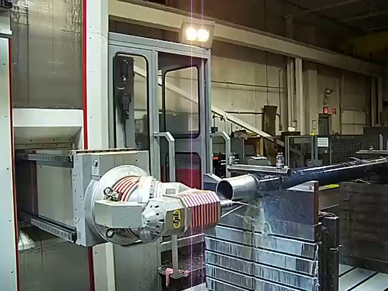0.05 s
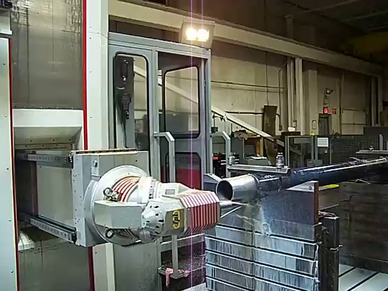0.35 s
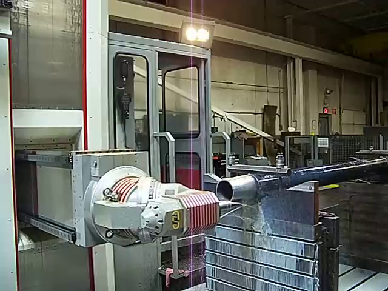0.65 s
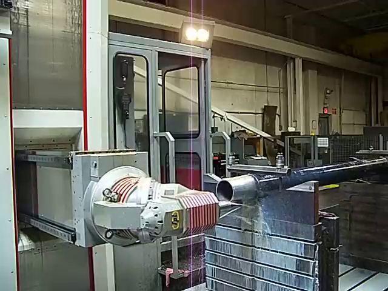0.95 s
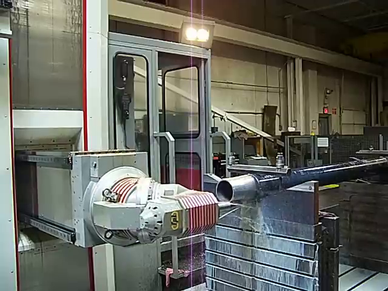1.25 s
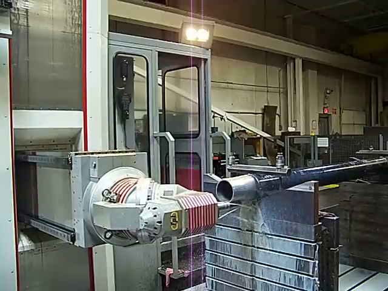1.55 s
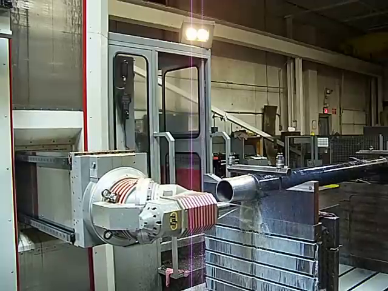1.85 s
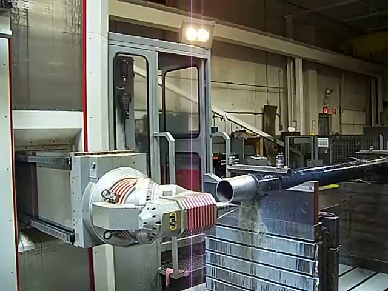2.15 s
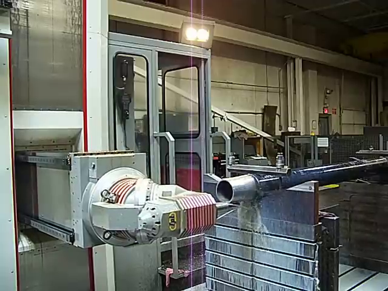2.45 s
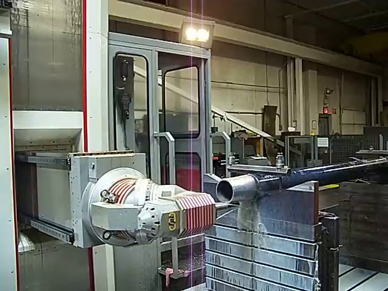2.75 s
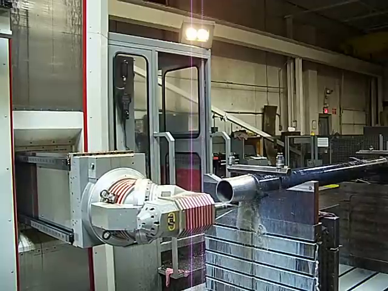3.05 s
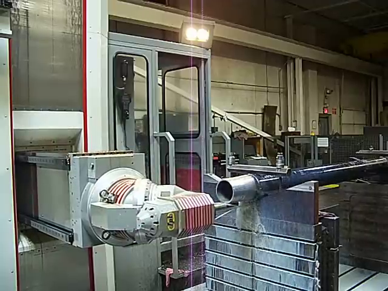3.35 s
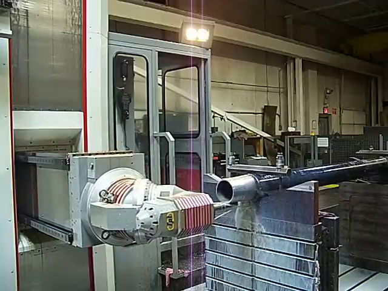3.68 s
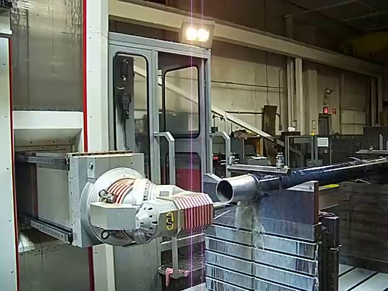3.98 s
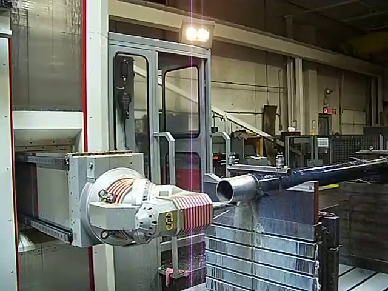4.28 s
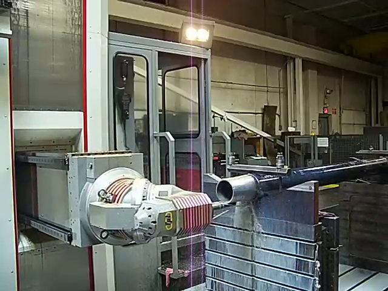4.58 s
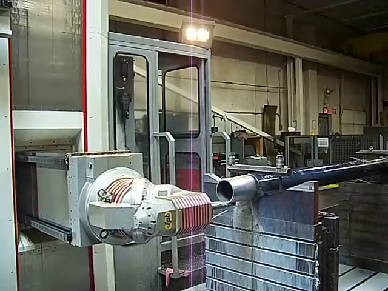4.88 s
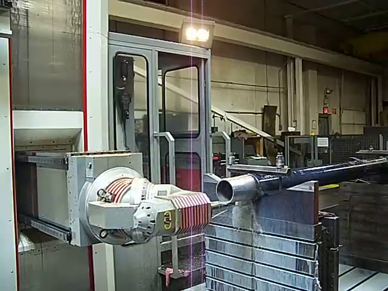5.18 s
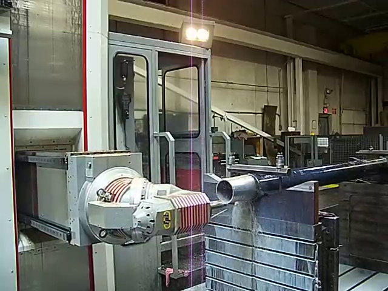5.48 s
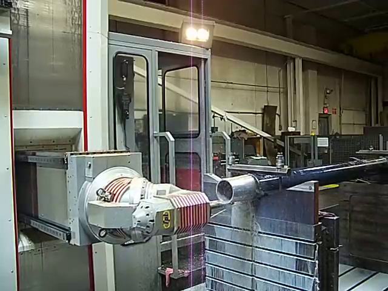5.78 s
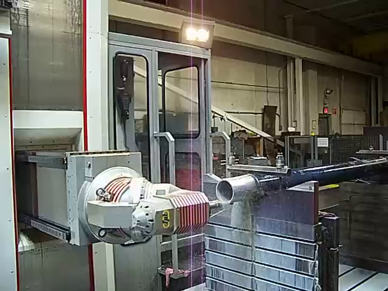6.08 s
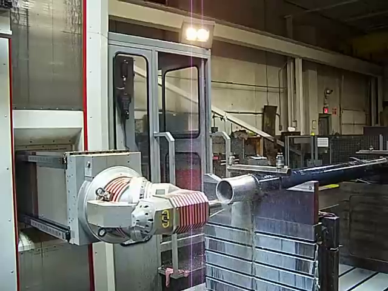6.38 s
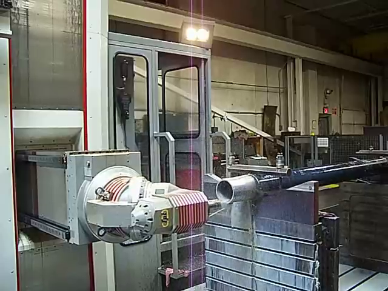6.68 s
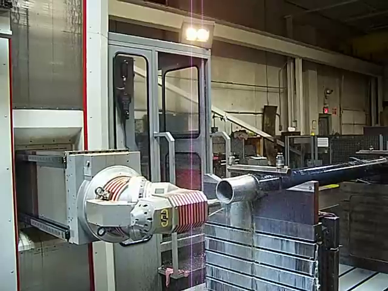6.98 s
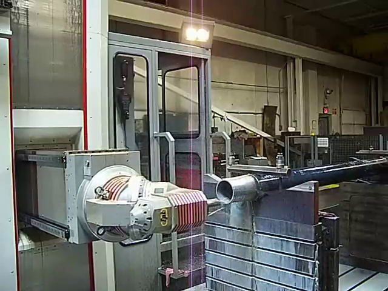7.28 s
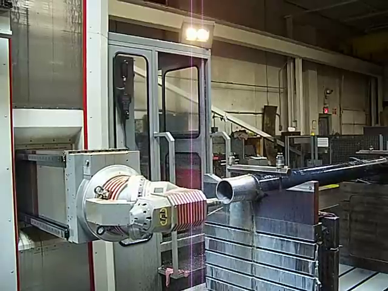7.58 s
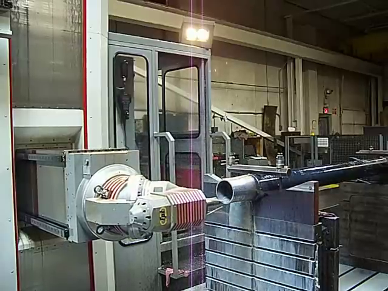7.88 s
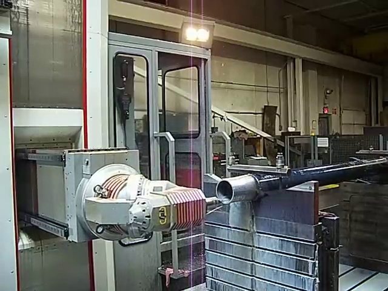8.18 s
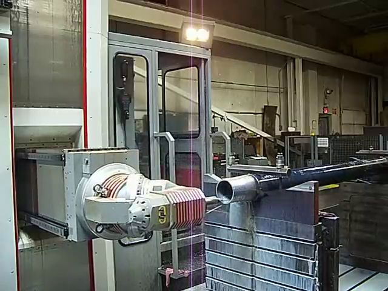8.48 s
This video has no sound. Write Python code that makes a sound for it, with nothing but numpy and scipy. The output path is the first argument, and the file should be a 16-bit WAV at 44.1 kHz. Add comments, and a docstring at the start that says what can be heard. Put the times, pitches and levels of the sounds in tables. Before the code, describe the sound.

A large milling machine cuts steel without a break, its buzzing hum mixed with the rough sound of tearing metal. The tool rings and breaks into repeated spells of high chatter and scraping, sometimes with a thin whistle. Coolant hisses and spatters brightly throughout, and a few chips tick against the guard. Pumps and motors drone behind, in a workshop hall with a light echo.

```python
"""Milling a steel block

A large milling machine cuts steel under a jet of coolant, in an echoing workshop hall.
Each tooth of the cutter knocks the frame and makes it hum; the tool rings, chatters and scrapes.
Coolant hisses and spatters off the cutter, chips tick on the guard, and pumps and motors drone."""
import sys
import numpy as np
from scipy import signal
from scipy.fft import rfft, irfft
from scipy.io import wavfile
from scipy.ndimage import uniform_filter1d

SR = 44100
rng = np.random.default_rng(int(sys.argv[2]) if len(sys.argv) > 2 else 0)


def put_to_file(sound):
    """Save the sound as 16-bit audio at rate SR, in the file named by the first command-line argument."""
    columns = np.atleast_2d(sound).T  # one column per channel
    safe = np.clip(columns, -1, 1)
    whole_steps = np.round(safe * 32767)
    wavfile.write(sys.argv[1], SR, whole_steps.astype(np.int16))


N = 384993
T = np.arange(N) / SR


def gain_of(db):
    """Turns decibels into a number to multiply by."""
    return 10 ** (np.asarray(db) / 20)


def evened(x):
    """Scales a signal to an average strength (rms) of 1."""
    return x / np.sqrt(np.mean(x ** 2) + 1e-20)


def curve(rows):
    """Joins (time_s, value) rows with straight lines."""
    return np.interp(T, *np.transpose(rows))


def coloured(x, points):
    """Shapes the lows and highs of x by (pitch_hz, level_db) points, at a strength of 1."""
    hz, db = np.transpose(points)
    shape_db = np.interp(np.log(np.fft.rfftfreq(N, 1 / SR) + 1), np.log(hz + 1), db)
    return evened(irfft(rfft(x) * gain_of(shape_db), N))


def drift(rate_hz, count=8192):
    """A random wobble of strength 1, mostly slower than rate_hz."""
    hz = np.fft.rfftfreq(count, T[-1] / count)
    wobble = irfft(rfft(rng.standard_normal(count)) / (1 + (hz / rate_hz) ** 2))
    return np.interp(T, np.linspace(0, T[-1], count), evened(wobble))


def tone(cycles, waver):
    """A pure tone that wavers as it crosses the hall."""
    path = 1 + waver * (drift(0.91) + 1j * drift(2.7))
    return evened((path * np.exp(2j * np.pi * (cycles + rng.random()))).real)


def spindle(tooth_hz=32.39, wander=.0005, hiccup_every_s=.67, hiccup_s=.022, hiccup_size=.037):
    """Counts the teeth at a slightly wandering pace; the sound hiccups every 0.67 s, like a tiny dropout."""
    in_hiccup = T % hiccup_every_s < hiccup_s
    rate_hz = tooth_hz * (1 + wander * drift(3)) + in_hiccup * hiccup_size / hiccup_s
    return np.cumsum(rate_hz) / SR


# How heavy the cut is: time_s, level_db
CUT_LOAD = [(0.0, -31), (0.31, -28.5), (0.56, -30.5), (1.17, -27.5), (1.58, -33), (1.77, -28.5),
            (2.72, -29.5), (2.77, -40.5), (2.92, -33), (3.69, -34.5), (3.77, -31.5), (4.71, -29.5),
            (5.08, -33), (6.05, -29), (6.37, -31.5), (6.78, -28), (7.63, -29.5), (8.73, -29.5)]
def load_gain(follow, usual_db=-30):
    """A heavier cut is louder: each dB of extra load adds `follow` dB."""
    return gain_of(follow * (curve(CUT_LOAD) - usual_db))


# The cutter's way along the block: time_s, share_of_way (0 to 1)
CUTTER_TRAVEL = [(0, 0), (2.3, 0.13), (3.2, 0.4), (4.8, 0.68), (6.5, 0.85), (8.73, 1)]
def travelled():
    """How far along the block the cutter has come."""
    return curve(CUTTER_TRAVEL)


# The balance of the frame's tones: tooth_rate_multiple, start_db, halfway_db, end_db
FRAME_TONES = [(3, -50.5, -52.5, -53), (5, -49.5, -49.5, -45.5), (6, -49.5, -48.5, -48),
               (7, -38.5, -43.5, -44.5), (8, -47, -48, -46.5), (9, -43, -47, -50), (10, -43.5, -53, -40.5),
               (11, -42, -41, -34.5), (12, -50, -55, -44.5), (13, -34, -38, -37.5), (14, -40.5, -46, -42),
               (15, -41.5, -45, -44), (16, -34.8, -47, -40.5), (17, -42.5, -45, -44), (18, -47, -43, -44.5),
               (19, -52, -43.5, -34.5), (20, -41.5, -42, -52), (21, -43, -50, -45), (22, -46, -46.5, -50),
               (29, -48, -48, -46.5), (30, -49.5, -55, -53), (31, -57, -51, -49.5), (32, -51, -52, -41.5),
               (34, -54, -55, -48)]
def frame_hum(teeth, level_db=-29.5, waver=0.086, ends_db=3, rise_db=2.0):
    """The teeth knock the frame into a hum that shifts as the cutter travels, weakest near mid-way."""
    way = travelled()
    hum = sum(gain_of(np.interp(way, [0, .5, 1], levels_db)) * tone(multiple * teeth, waver)
              for multiple, *levels_db in FRAME_TONES)
    hum = hum / np.sqrt(uniform_filter1d(hum ** 2, SR))  # steady from second to second
    place_db = ends_db * (2 * way - 1) ** 2 + rise_db * (way - .5)
    return gain_of(level_db + place_db) * load_gain(follow=0.56) * hum


# The lows and highs of tearing metal: pitch_hz, level_db
TEARING_COLOUR = [(30, -9), (100, -4), (180, -4), (260, -1), (450, -2), (680, 1.5), (770, -0.5), (880, 3),
                  (1020, 0.9), (1400, -0.5), (1900, -4), (2500, -4.5), (3100, -9), (3600, -16), (4200, -47)]
def tearing(teeth, level_db=-29, bite_db=-0.7, tilt_db=0.2, uneven_db=1.12, surge_db=0.86, per_s=9000):
    """Metal tears off in tiny cracks, loudest as a tooth enters and leaves the block."""
    cracks = (rng.random(N) < per_s / SR) * rng.standard_normal(N)
    pulse_db = bite_db * np.cos(4 * np.pi * teeth) + tilt_db * np.cos(2 * np.pi * teeth)
    cracks *= gain_of(pulse_db + uneven_db * drift(31))
    loudness = gain_of(level_db + surge_db * drift(19)) * load_gain(follow=1.12)
    return loudness * coloured(cracks, TEARING_COLOUR)


def slips(teeth, rough, count=14):
    """The two teeth catch and slip at the same places in every turn; `rough` adds noise."""
    kicks = np.zeros(N)
    for place, size in zip(rng.random(count), np.geomspace(1, .4, count)):
        kicks += size * np.diff(np.floor(teeth / 2 + place), prepend=0)
    return evened(kicks * gain_of(2 * rng.standard_normal(N))) + rough * rng.standard_normal(N)


def ringing(kicks, notes, swell_s=0.00074):
    """Kicked metal rings at its own notes, without a click; wider notes die away sooner."""
    t = T[:SR // 8]
    ring = sum(gain_of(db) * np.sqrt(width) * np.exp(-np.pi * width * t) * np.sin(2 * np.pi * hz * t)
               for hz, width, db in notes)
    ring *= 1 - np.exp(-t / swell_s)
    return evened(signal.oaconvolve(kicks, ring)[:N])


# How hard the tool rubs: time_s, level_db
TOOL_RUB = [(0.0, -34.5), (0.49, -29), (0.68, -39), (1.58, -28.5), (2.21, -40), (2.33, -30), (2.72, -40),
            (2.87, -32), (2.92, -39.5), (3.47, -30), (3.96, -40), (4.98, -35), (5.25, -28), (6.37, -41),
            (6.47, -32.5), (8.19, -35), (8.61, -40), (8.73, -32)]
# The notes the tool rings with: pitch_hz, width_hz, level_db
TOOL_NOTES = [(2277, 83, -6.5), (2500, 87, -12), (2785, 42, -10), (2841, 96, 0.5), (2907, 130, -8),
              (3830, 31, -23), (4930, 54, -18.5), (5290, 41, -15), (7200, 70, -20.5)]
def tool_squeal(teeth, level_db=-37.5, follow=0.79, usual_rub_db=-36, uneven_db=1.1):
    """Each slip rings the tool, louder when it rubs harder."""
    swell_db = follow * (curve(TOOL_RUB) - usual_rub_db) + uneven_db * drift(8.8)
    return gain_of(level_db + swell_db) * ringing(slips(teeth, rough=0.8), TOOL_NOTES)


# The notes the block rings with: pitch_hz, width_hz, level_db
BLOCK_NOTES = [(625, 67, -4), (1038, 79, 1), (1370, 83, -6)]
def block_ring(teeth, level_db=-35, early_db=-16):
    """The teeth ring the block, more and more as the cutter nears its free end."""
    loudness = gain_of(level_db + early_db * (1 - travelled())) * load_gain(follow=0.71)
    return loudness * ringing(slips(teeth, rough=1.3), BLOCK_NOTES)


def splash_gain(slosh_db=0.9, rise_db=1):
    """The cutter throws more coolant in a heavy cut and further along, and it sloshes at random."""
    return load_gain(follow=0.26) * gain_of(rise_db * (travelled() - .5) + slosh_db * drift(7))


def drops(per_s, spread_db):
    """Drops land at random, a few of them large."""
    size = gain_of(spread_db * np.minimum(rng.exponential(1, N), 4))
    return evened((rng.random(N) < per_s / SR) * rng.choice([-1, 1], N) * size)


# The bright hiss of coolant, also used for the chips: pitch_hz, level_db
HISS_COLOUR = [(2000, -43.5), (4200, -22.5), (4550, -18), (5000, -13.5), (5600, -8), (6200, -2.5),
               (6800, -0.5), (7200, 0), (7600, -3), (7950, -9), (8400, -12), (8700, -31), (9200, -65)]
def coolant_hiss(teeth, level_db=-31.0, throb_db=-0.55, gust_db=1.76):
    """The jet breaks on the block into an even hiss of drops."""
    swell_db = throb_db * np.cos(2 * np.pi * (teeth + 0.2)) + gust_db * drift(96)
    patter = drops(per_s=9000, spread_db=2.1) * gain_of(swell_db)
    return gain_of(level_db) * coloured(patter, HISS_COLOUR)


# The thin, high sound of fine spray: pitch_hz, level_db
SPATTER_COLOUR = [(3000, -48), (6000, -24), (6900, -8.5), (7300, 1), (7700, 2.5), (8050, -2), (8400, -10),
                  (8700, -19), (8950, -32.5), (9200, -61)]
def coolant_spatter(teeth, level_db=-33.5, throb_db=4.0, gust_db=3, flicker_db=-2.5, limit_db=9):
    """Every tooth that crosses the jet flings off a burst of fine spray."""
    burst_db = throb_db * np.cos(2 * np.pi * (teeth + 0.22)) + np.cos(4 * np.pi * teeth)
    burst_db += gust_db * drift(120) + flicker_db * drift(350)
    patter = drops(per_s=6000, spread_db=3.4) * gain_of(np.minimum(burst_db, limit_db))
    return gain_of(level_db) * coloured(patter, SPATTER_COLOUR)


# The tones of pumps and motors: pitch_hz, level_db
MOTOR_TONES = [(57.3, -53), (78, -59), (122, -55), (130.5, -52), (170, -53), (181.8, -45.5), (221.5, -50),
               (279, -53), (441.8, -42), (663, -47), (883, -49.5)]
# The lows and highs of the hall's rush: pitch_hz, level_db
HALL_COLOUR = [(8, -0.5), (30, 0.5), (90, -3), (170, -4.5), (500, 5.5), (1200, 9), (1900, 3.5), (2400, 7.5),
               (3000, 3), (3500, -13.5), (3850, 0), (4200, -22.5), (6000, -52)]
def workshop(air_db=-35):
    """Pumps and motors drone over the even rush of the hall."""
    drone = sum(gain_of(db) * tone(hz * T, waver=.3) for hz, db in MOTOR_TONES)
    return drone + gain_of(air_db) * coloured(rng.standard_normal(N), HALL_COLOUR)


# The lows and highs of a scraping tooth: pitch_hz, level_db
SCRAPE_COLOUR = [(1800, -23.5), (2330, -1.5), (2620, -7), (2950, -1), (3200, -6), (3600, -11),
                 (4200, -22.5), (4600, -9), (5000, -14), (5500, -8.5), (6200, -0.5), (7000, -17),
                 (9000, -40)]
# Spells when a tooth drags: start_s, end_s, scrape_db, whistle_db, chatter_db, chatter_hz
DRAG_SPELLS = [(0.224, 0.584, -38.5, -55, -39, 2885), (1.38, 1.737, -33.5, -41.5, -42, 2830),
               (1.72, 2.22, -44, -63, -37, 2856), (2.248, 2.594, -33, -44, -30, 2830),
               (2.6, 2.96, -37, -55, -35.5, 2845), (3.12, 3.81, -40.5, -54, -36.5, 2804),
               (5.014, 5.42, -34, -48, -39, 2835), (5.35, 5.72, -36.5, -47, -32.5, 2900),
               (5.683, 6.12, -51, -55, -38, 2820), (6.9, 7.5, -40.5, -55, -42, 2750)]
def tooth_drag(teeth, whistle_hz=5400, whistle_pull_hz=12, chatter_pull_hz=19,
               flutter_db=2.2, beat_db=2, fade_in_s=0.035, fade_out_s=0.056):
    """A dragging tooth scrapes, whistles and makes the tool chatter; friction pulls the pitch about."""
    scrape = coloured(slips(teeth, rough=1.1), SCRAPE_COLOUR)
    whistle_cycles = np.cumsum(whistle_hz + whistle_pull_hz * drift(40)) / SR
    whistle = tone(whistle_cycles, waver=0.24) * evened(1 + 0.38 * drift(60))
    pulled_cycles = np.cumsum(chatter_pull_hz * drift(44.7)) / SR
    flutter = evened(gain_of(flutter_db * drift(50) + beat_db * np.cos(2 * np.pi * teeth)))
    out = np.zeros(N)
    for start_s, end_s, scrape_db, whistle_db, chatter_db, chatter_hz in DRAG_SPELLS:
        fade = np.clip(np.minimum((T - start_s) / fade_in_s, (end_s - T) / fade_out_s), 0, 1)
        chatter = gain_of(chatter_db) * flutter * np.sin(2 * np.pi * (chatter_hz * T + pulled_cycles))
        out += fade * (gain_of(scrape_db) * scrape + gain_of(whistle_db) * whistle + chatter)
    return out


# Chips that hit the guard: start_s, peak_db
CHIP_HITS = [(.976, -14.5), (2.786, -12), (4.0, -14), (4.918, -16), (6.27, -16)]
def chip_ticks(decay_s=0.00088):
    """Each flying chip makes one short, bright tick."""
    out = np.zeros(N)
    for start_s, peak_db in CHIP_HITS:
        burst = rng.standard_normal(N) * (T >= start_s) * np.exp(-abs(T - start_s) / decay_s)
        tick = coloured(burst, HISS_COLOUR)
        out += gain_of(peak_db) * tick / abs(tick).max()
    return out


def hall_echoes(x, echo_db=-12, fade_s=0.54, per_s=2000, delay_s=.006):
    """The hall adds scattered echoes that die away."""
    t = T[:SR]
    bounces = rng.standard_normal(SR) * (rng.random(SR) < per_s / SR)
    bounces *= (t > delay_s) * gain_of(-60 * t / fade_s)
    echoes = signal.oaconvolve(x, bounces / np.linalg.norm(bounces))[:N]
    amount = gain_of(echo_db)
    return (x + amount * echoes) / np.sqrt(1 + amount ** 2)


def scene():
    """One spindle sets the pace of the hum, the cut and the spray; the workshop drones behind."""
    teeth = spindle()
    spray = splash_gain() * (coolant_hiss(teeth) + coolant_spatter(teeth))
    cut = tearing(teeth) + tool_squeal(teeth) + tooth_drag(teeth) + chip_ticks() + block_ring(teeth)
    return (frame_hum(teeth) + hall_echoes(cut + spray) + workshop())[None]


def record(dry):
    """Takes away the highest treble."""
    cutoff_hz = 9100
    lowpass = signal.firwin(601, cutoff_hz, window=("kaiser", 9), fs=SR)
    return signal.oaconvolve(dry, lowpass[None], "same")


dry = scene()
out = record(dry)
put_to_file(out)
```